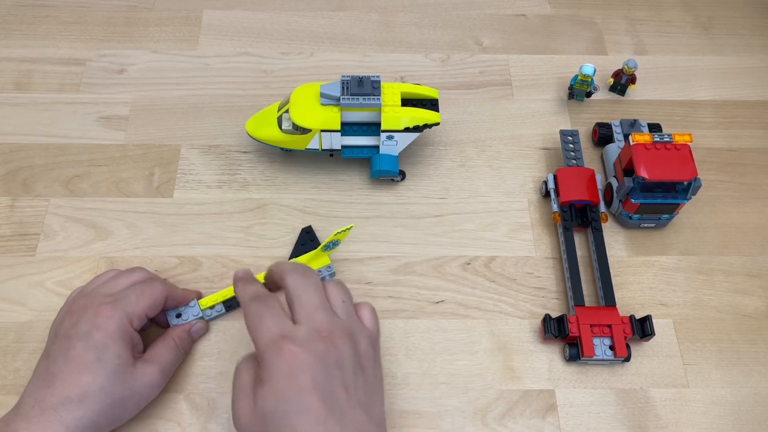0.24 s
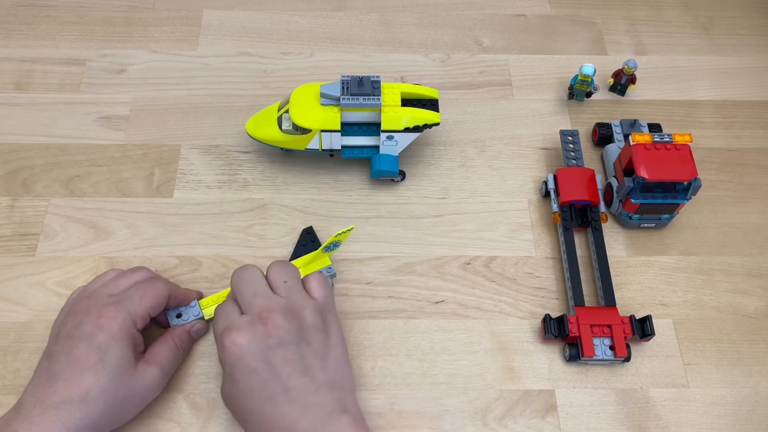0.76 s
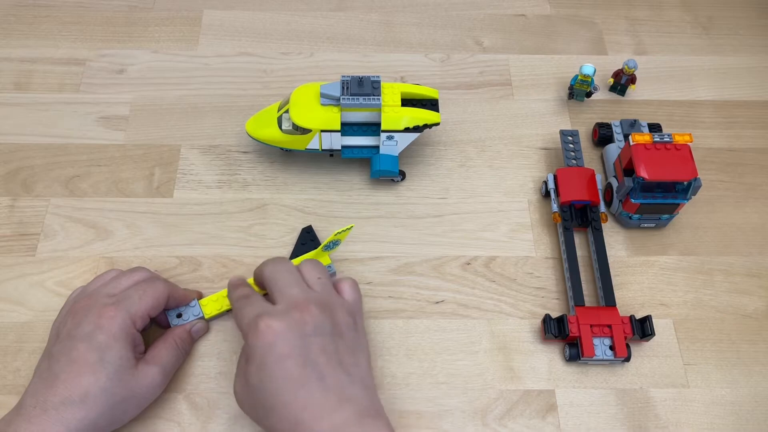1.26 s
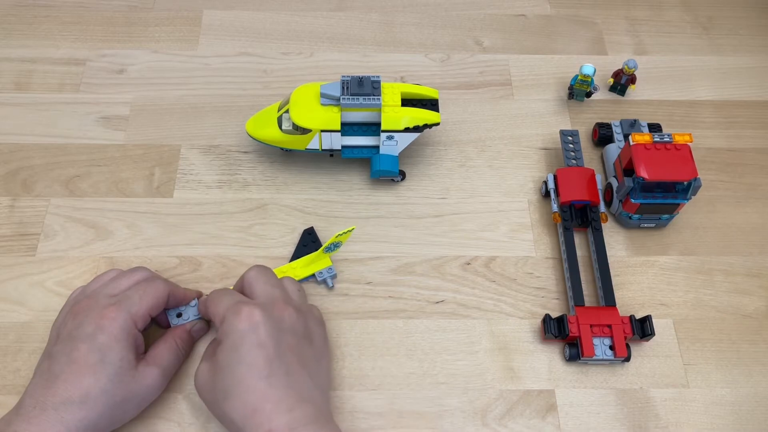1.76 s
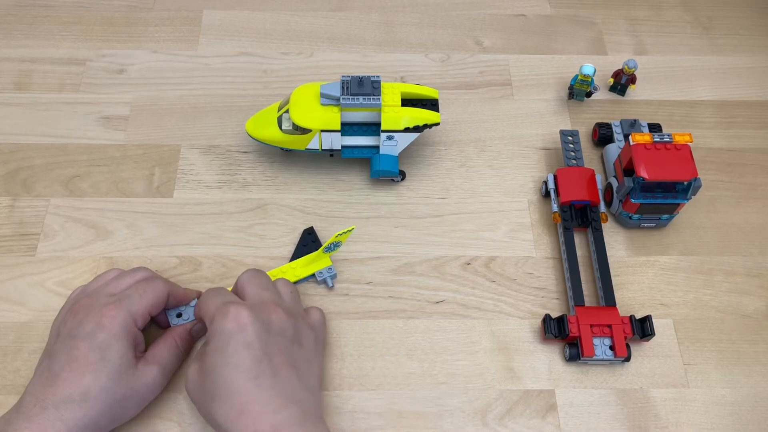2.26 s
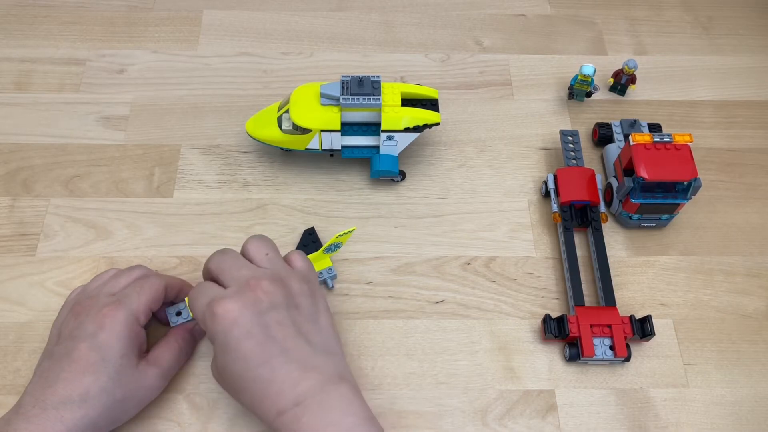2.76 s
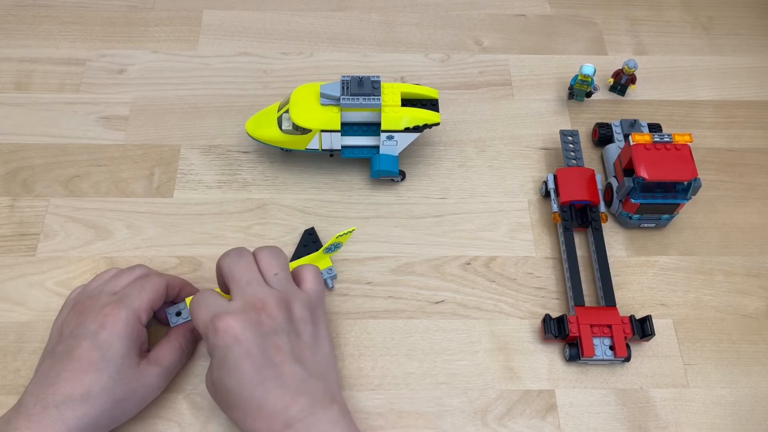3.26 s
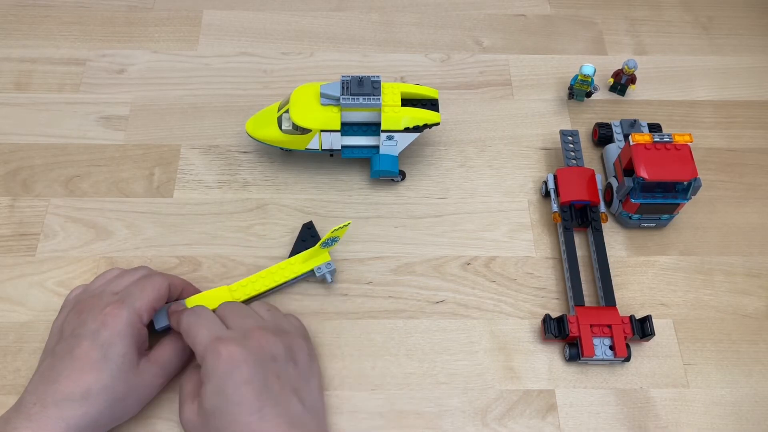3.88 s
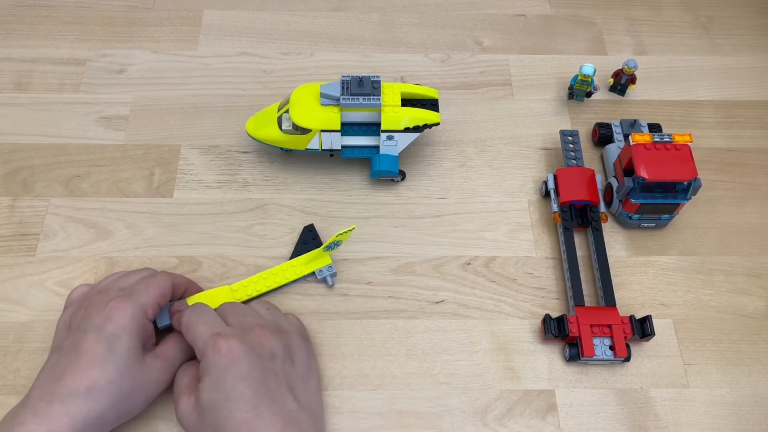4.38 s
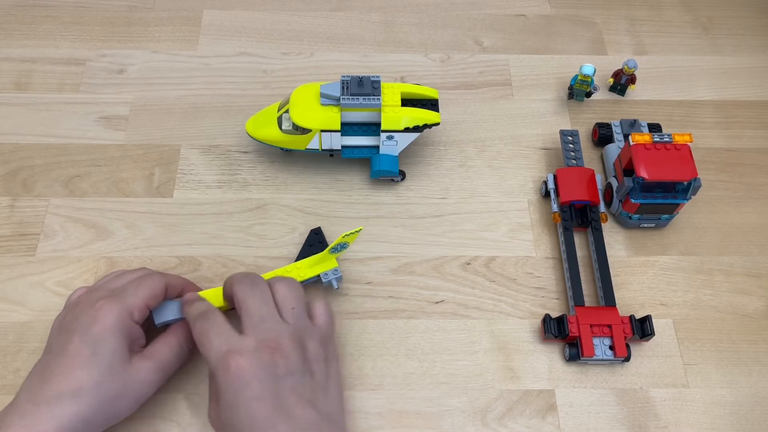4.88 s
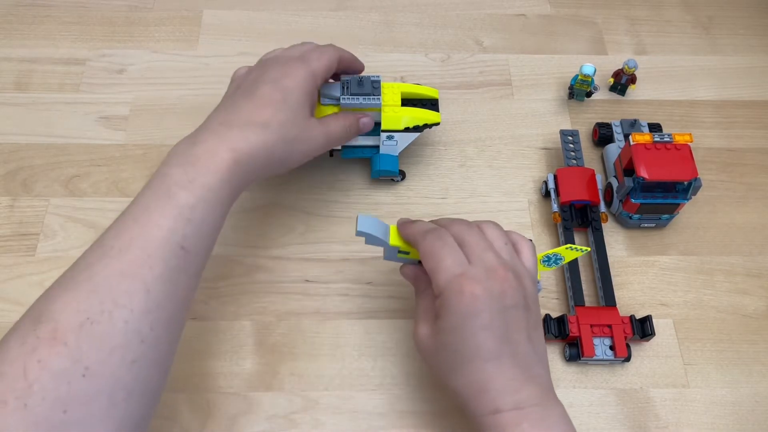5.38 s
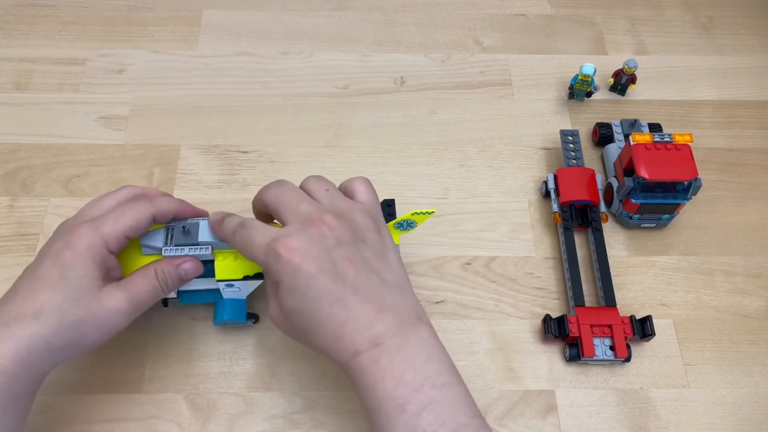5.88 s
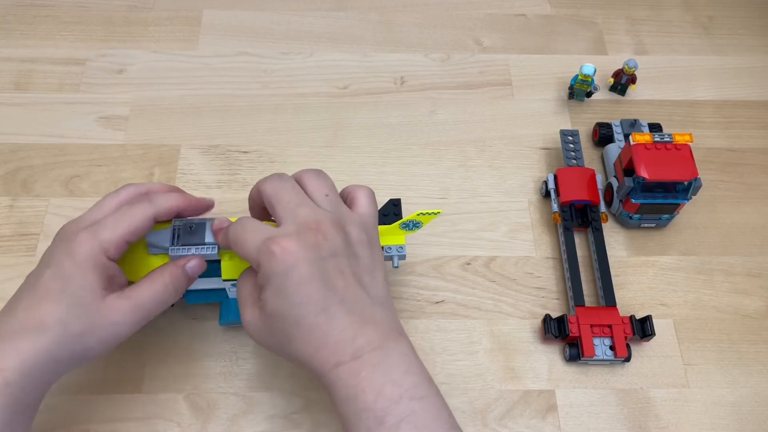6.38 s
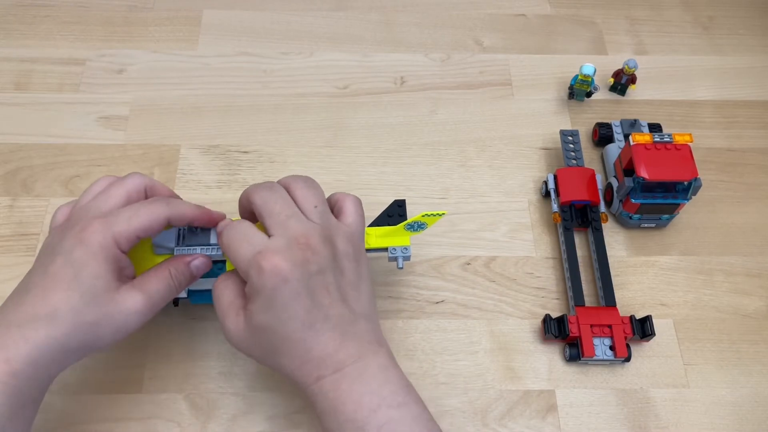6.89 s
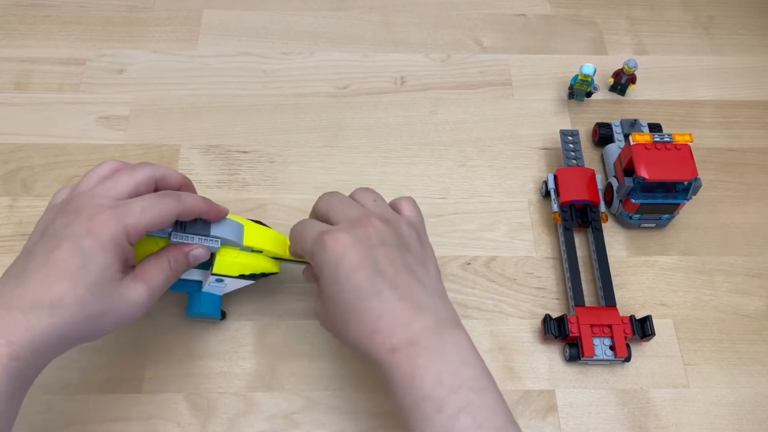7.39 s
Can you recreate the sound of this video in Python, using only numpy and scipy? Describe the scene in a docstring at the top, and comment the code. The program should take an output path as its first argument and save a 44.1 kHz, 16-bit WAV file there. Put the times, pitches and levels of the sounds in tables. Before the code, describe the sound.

A close microphone in a small room picks up low hum, rumble and faint hiss, with soft finger rubs and tiny plastic taps from the start. At 0.9 s a toy brick snaps down with a bright click and solid wooden table thump, ringing briefly in the room. Fingers rub again near 1.15 s. Sound vanishes completely from about 1.47 to 1.76 s, returning with a faint pop. A light click at 1.93 and a duller thumping one at 2.06 s follow, then sparse, very quiet ticks and handling until 5.2 s while the hum swells and dips. A tiny dropout at 5.2 s leaves a quieter hum and drier echo. Hollow plastic rattles cluster at 5.4-5.9 s, faint ticks continue, and two hard, ringing snaps come at 7.36 and 7.5 s, followed by a soft finger rub.

```python
"""A low hum and rumble with a soft rub of fingers come first; then plastic toy bricks are pressed together
by hand on a wooden table in a small room. Plates snap onto a tail boom and thump the table; then the boom is
fitted to a hollow hull, with small rattles and two hard snaps. The sound cuts out briefly twice.
Each contact is a noisy force with one jolt that drives damped resonances, a table thump and diffuse echoes;
hum, rumble, rub and hiss are shaped noise. Echo, hum and rumble change abruptly in the second silence."""
import sys
import numpy as np
from scipy import signal
from scipy.fft import rfft, irfft, next_fast_len
from scipy.io import wavfile
from scipy.ndimage import uniform_filter1d, map_coordinates

SR = 44100
rng = np.random.default_rng(int(sys.argv[2]) if len(sys.argv) > 2 else 0)


def generate_wav(signal):
    """Clip the signal to [-1, 1] and save it as 16-bit WAV at the path in sys.argv[1]."""
    frames = np.transpose(np.atleast_2d(signal))
    scaled = np.clip(frames, -1, 1) * 32767
    pcm = np.round(scaled).astype(np.int16)
    wavfile.write(sys.argv[1], SR, pcm)


N = 336924
SIZE, LEAD = 32768, 1024  # length of one contact and the part of it ahead of the jolt [samples]
HZ = np.fft.rfftfreq(SIZE, 1 / SR)
SECOND_PART_S = 5.21  # echo, hum and rumble change abruptly here, within the second silence [s]

# resonances of the hull in three groups, frame, shell and small plates, before a power sharpens them:
# (centre [Hz], width [Hz], level [dB])
HULL_MODES = ([(792, 150, -1.5), (920, 230, 0)], [(1378, 190, -1.5), (1537, 160, 1.5), (1724, 180, -2)],
              [(2145, 130, -2), (2500, 220, -4), (2938, 280, -1.5), (3810, 340, -4)])


def amp(db):
    """Decibel law: 20 dB are a tenfold amplitude."""
    return 10 ** (np.asarray(db) / 20)


def unit(x):
    """Normalisation to rms 1."""
    return x / np.sqrt(np.mean(x ** 2) + 1e-20)


def burst(x, db):
    """Energy scaling: a short sound gets the energy of 10 ms at this rms level."""
    return x * amp(db) * np.sqrt(SR / 100 / (np.sum(x ** 2) + 1e-20))


def along(points, hz):
    """Interpolation of (Hz, value) points on a logarithmic frequency axis."""
    f, v = np.transpose(points)
    return np.interp(np.log(hz + 1), np.log(f), v)


def curve(rows):
    """Linear interpolation of (s, value) rows to one value per sample."""
    s, v = np.transpose(rows)
    return np.interp(np.arange(N) / SR, s, v)


def wobble(rate):
    """Smooth random variation: a spline through Gaussian knots, rate knots a second."""
    knots = rng.standard_normal(int(N * rate / SR) + 4)
    return map_coordinates(knots, [np.arange(N) * rate / SR])


def filtered(x, response):
    """Linear filtering: the spectrum of x times a response of frequency."""
    m = next_fast_len(len(x) + 8192)
    return irfft(rfft(x, m) * response(np.fft.rfftfreq(m, 1 / SR)), m)[:len(x)]


def noise(spectrum):
    """Coloured noise: steady white noise through a spectrum, rms 1."""
    return unit(filtered(rng.standard_normal(N), lambda hz: amp(along(spectrum, hz))))


def resonance(modes, hz):
    """Damped resonance: the powers of several resonators add to one gain."""
    power = sum((amp(db) * hz * w) ** 2 / ((c * c - hz * hz) ** 2 + (hz * w) ** 2) for c, w, db in modes)
    return np.sqrt(power)


def causal(gain):
    """Minimum phase: folding the cepstrum gives the causal response of this gain, scaled to peak 1."""
    cepstrum = irfft(np.log(gain / gain.max() + 1e-6))
    cepstrum[1:SIZE // 2] *= 2
    cepstrum[SIZE // 2 + 1:] = 0
    return np.exp(rfft(cepstrum))


def ring(force, gain):
    """Forced vibration: a force drives a body that has this gain."""
    return irfft(rfft(force) * causal(gain))


def bricks():
    """Impact excitation: hard snaps and light knocks, each with its jolt at its moment."""
    # studs snapping home, levels as rms over 10 ms: (time [s], table thump [dB], thump cut-off [Hz],
    # frame clack [dB], shell ring [dB], plate crack [dB], stud tick [dB], top octave re tick [dB],
    # rise [ms], room re direct sound [dB], stud pitch [Hz])
    snaps = [(0.903, -30, 900, -41, -39, -57, -31.5, -1, .19, -6.5, 9700),
             (0.9063, -16.5, 900, -33, -27.5, -31.5, -29, -2, 0.96, -4, 6980),
             (1.9292, -47, 600, -56, -38.5, -47.5, -46, -2, 0.34, -4.5, 4300),
             (2.0599, -27, 330, -41, -39, -50.5, -44, -14.5, .29, -5, 4200),
             (7.353, -25.5, 90, -53.5, -48.5, -52, -61.5, -9.5, 1.33, -4, 6000),
             (7.3596, -28.5, 700, -29.5, -15, -19, -26, -3, 3.02, -12.5, 7550),
             (7.372, -38.5, 500, -35, -41, -42, -38, -9, 1.8, -5, 6000),
             (7.5025, -23, 600, -51, -25, -37.5, -27.5, -16.5, 3.03, -11.5, 5600)]
    # light knocks as a piece is shifted in the hands: (time [s], table thump [dB], shell ring [dB],
    # stud tick [dB], top octave re tick [dB], stud pitch [Hz])
    taps = [(0.138, -60, -60.5, -61.5, -1, 3800), (0.163, -59, -63, -62, -3, 9800),
            (0.457, -79, -69, -68.5, -21, 4300), (0.815, -88, -74, -100, -1, 6000),
            (1.2243, -64, -59, -65, -5, 6140), (2.4162, -59.5, -64.5, -52, -11.5, 7065),
            (2.704, -60, -69, -88, -8.5, 6020), (2.734, -52, -64, -99.5, -6, 6000),
            (2.993, -60.5, -77, -74.5, -5.5, 4350), (3.5573, -60, -58, -59, -4.5, 4980),
            (3.89, -65, -60.5, -80.5, -1, 6000), (4.0329, -54.5, -60, -67, -30, 5020),
            (4.046, -57.5, -63.5, -70.5, -25, 5950), (4.185, -49, -85.5, -80, -15, 6000),
            (4.695, -55, -58, -59.5, -46, 5600), (4.862, -81.5, -65, -52.5, -5, 3400),
            (4.999, -73, -70, -75, -10.5, 6000), (5.231, -60, -71, -70, -2, 6500),
            (5.436, -66, -54.5, -84, -8, 3820), (5.4641, -67, -48.5, -70, -11, 3840),
            (5.47, -72, -49.5, -67, -11, 3800), (5.7316, -56, -40.5, -55, -12, 3200),
            (5.7426, -45, -46.5, -47, -16.5, 4450), (5.747, -66, -45, -59, -8, 3400),
            (5.81, -59.5, -57.5, -83.5, -11, 6000), (5.8873, -52, -44, -56.5, -11, 4200),
            (5.9169, -45.5, -48.5, -54.5, -9, 4120), (6.003, -64, -64.5, -77, -3.5, 6000),
            (6.217, -71, -73.5, -88.5, -2, 4420), (6.38, -63.5, -70, -72.5, 1.5, 6000),
            (6.623, -78, -69.5, -64, -5.5, 3600), (7.0896, -54, -59, -65, 2, 7500),
            (7.295, -62, -67, -74.5, -8.5, 6000), (7.332, -69.5, -51.5, -61, -12, 5940)]
    # ring of the small brick under the finger when clamped in a snap [gain]
    snap_stud_ring = 1.4
    out = np.zeros(N + 2 * SIZE)
    for row in snaps:
        out[round(row[0] * SR):][:SIZE] += contact(*row, snap_stud_ring)
    for row in taps:
        out[round(row[0] * SR):][:SIZE] += tap(*row)
    return out[LEAD:LEAD + N]


def contact(s, thump_db, thump_hz, clack_db, ring_db, crack_db, tick_db, top_db, rise_ms, room_db,
            stud_hz, stud_ring):
    """Modal excitation: one contact ticks studs, rings plastic, thumps the table and wakes the room."""
    # resonances of the boom, grouped as frame, shell and small plates, before a power sharpens them:
    # (centre [Hz], width [Hz], level [dB])
    boom_modes = ([(680, 200, 0), (780, 490, -0.5)], [(1282, 170, 2.5), (1536, 240, 0.5),
                  (1810, 150, -6.5)], [(2520, 490, 0), (3010, 400, 0), (3400, 440, -7), (4200, 530, -2.5)])
    # table thump in the first part: (frequency [Hz], relative gain [dB])
    first_table = [(30, -13.5), (60, -8), (130, 0), (220, 1.5), (340, -3.5), (450, -13.5), (700, -27.5),
                   (2000, -61), (5000, -100)]
    # table thump in the second part: (frequency [Hz], relative gain [dB])
    second_table = [(25, -7), (55, -5.5), (100, 3), (160, -6.5), (220, 8), (275, -9.5), (345, -0.5),
                    (430, -16), (540, -7.5), (700, -43.5), (2000, -64.5), (5000, -100)]
    # longer echoes in the first part: (frequency [Hz], time to fall 60 dB [s])
    first_tail = [(60, 0.77), (150, 0.35), (300, 0.16), (700, 0.42), (1400, .48), (2200, 0.22), (3000, .49),
                  (3800, .46), (7000, .37), (15000, 0.16)]
    # drier echoes in the second part: (frequency [Hz], time to fall 60 dB [s])
    second_tail = [(60, 0.6), (200, 0.12), (700, 0.23), (1300, 0.11), (1700, 0.17), (2300, 0.18),
                   (7000, 0.14), (15000, 0.13)]
    # stud tick before its own ring and top octave: (frequency [Hz], relative gain [dB])
    stud_spectrum = [(600, -24), (1500, -10.5), (3000, -5), (4500, 0), (6000, 0.5), (8600, -2.5),
                     (10000, -1), (11500, -4.5), (16000, -9.5)]
    stud_width = 0.13  # re its pitch
    table_echo_db, room_modes_db = 2.5, -0.5  # re the room level of the contact; modes before softening

    if s < SECOND_PART_S:
        modes, table_gain, decay = boom_modes, first_table, first_tail
    else:
        modes, table_gain, decay = HULL_MODES, second_table, second_tail

    # where the piece is pressed decides how strongly frame, shell and plates answer
    levels = (clack_db, ring_db, crack_db)
    parts = [amp(db) * unit(resonance(group, HZ) ** 1.84) for group, db in zip(modes, levels)]
    gain = np.linalg.norm(parts, axis=0)
    body_force = jolt(rise_ms, fall_ms=3.0, grit=2.3)
    body = np.sqrt(np.mean(gain ** 2)) * burst(ring(body_force, gain), 0)

    # the small brick under the finger has its own pitch; a softer contact loses the top octave
    top_octave = along([(8000, 0), (12000, 1)], HZ)
    bright = amp(along(stud_spectrum, HZ) + top_db * top_octave)
    bright *= 1 + stud_ring * resonance([(stud_hz, stud_width * stud_hz, 0)], HZ)
    stud_force = jolt(rise_ms, fall_ms=2.7, grit=19.0)
    plastic = body + burst(ring(stud_force, bright), tick_db)

    # the thump starts just before the jolt; a lower cut-off makes it duller
    soft = 1 / np.sqrt(1 + (HZ / thump_hz) ** 4)
    push = irfft(causal(soft * amp(along(table_gain, HZ))))
    early = round((rise_ms + .6) * SR / 1000)
    table = burst(-np.roll(push, LEAD - early), thump_db)

    echo = room(diffuse(plastic, blur_hz=700), decay, build_s=0.0034)
    echo += amp(table_echo_db) * room(table, decay, build_s=0.0026)
    echo += ring(burst(low_ring(decay), thump_db + room_modes_db), soft)
    return plastic + table + amp(room_db) * echo


def tap(s, thump_db, ring_db, tick_db, top_db, stud_hz):
    """Coupled vibration: in a light knock frame follows table and shell, plates follow shell and stud."""
    # a knock in the first part: (rise [ms], frame clack re the mean of thump and ring [dB],
    # room before the shading by the hand [dB])
    first_touch = (0.55, -1.5, -4.5)
    # a knock in the second part: (rise [ms], frame clack re the mean of thump and ring [dB],
    # room before the shading by the hand [dB])
    second_touch = (2.92, -12.5, -10)
    plates_db = -3.5  # small plates re the mean of shell and stud
    # a hand that hides the top octave leaves more of the room: dB gained per dB lost
    shade_to_room = 0.066
    tap_thump_hz, tap_stud_ring = 790, 2.5  # thump cut-off [Hz]; ring of the loose small brick [gain]
    rise_ms, frame_db, open_room_db = first_touch if s < SECOND_PART_S else second_touch
    clack_db = (thump_db + ring_db) / 2 + frame_db
    crack_db = (ring_db + tick_db) / 2 + plates_db
    room_db = open_room_db - shade_to_room * top_db
    return contact(s, thump_db, tap_thump_hz, clack_db, ring_db, crack_db, tick_db, top_db,
                   rise_ms, room_db, stud_hz, tap_stud_ring)


def jolt(rise_ms, fall_ms, grit):
    """Impulsive force: noise swells up to one jolt, then dies away."""
    ms = (np.arange(SIZE) - LEAD) * 1000 / SR
    swell = rng.standard_normal(SIZE) * np.exp(-np.abs(ms) / np.where(ms < 0, rise_ms, fall_ms))
    force = grit * swell / np.linalg.norm(swell) + (ms == 0)
    # a hard contact drives all frequencies about equally
    return ring(force, 1 / (unit(np.abs(rfft(force))) + 1.3))


def diffuse(x, blur_hz):
    """Radiation on all sides: it evens out the narrow peaks and dips of a piece, at equal energy."""
    power = np.abs(rfft(x)) ** 2 + 1e-14
    broad = np.abs(uniform_filter1d(power, size=max(1, int(blur_hz / HZ[1]))))
    evened = ring(x, np.clip(broad / power, .1, 8) ** .2)
    return burst(evened, db=0) * np.sqrt(np.sum(x ** 2) * 100 / SR)


def room(x, decay, build_s):
    """Diffuse reverberation: echoes with the energy of x, each frequency dying at its own speed."""
    hz, t, z = signal.stft(rng.standard_normal(SIZE), SR, nperseg=256)
    t60 = along(decay, hz)[:, None]
    fading = z * amp(-60 * t / t60) / np.sqrt(t60)
    tail = signal.istft(fading, SR, nperseg=256)[1][:SIZE]
    tail *= 1 - np.exp(-(np.arange(SIZE) / SR / build_s) ** 2)
    wet = signal.fftconvolve(x, tail)[:SIZE]
    return wet * np.linalg.norm(x) / np.linalg.norm(wet)


def low_ring(decay):
    """Room modes: the low resonances of the room swell and fade after a thump."""
    # low resonances of the room: (frequency [Hz], relative level [dB])
    room_modes = [(138, 0.5), (162, -8), (218, -2.5), (256, -3.5), (298, -8), (343, -6), (384, -11.5),
                  (532, -15)]
    t = np.maximum(np.arange(SIZE) - LEAD, 0) / SR
    total = np.zeros(SIZE)
    for hz, db in room_modes:
        fade = amp(db - 60 * t / along(decay, hz))
        total += fade * np.sin(2 * np.pi * (hz * t + rng.random()))
    return total * (1 - np.exp(-t / 0.0044))


def fingers():
    """Stick-slip friction: skin drags over plastic in uneven slips, swelling with each change of grip."""
    # colour of skin on plastic: (frequency [Hz], relative level [dB])
    skin = [(200, -11), (700, 1), (1100, -3), (1650, -2.5), (2200, -11.5), (4000, -13), (7000, -14),
            (15000, -26.5)]
    # fingers sliding to a new grip: (middle [s], half length [s], level [dB])
    slides = [(0.014, 0.075, -74), (0.165, 0.025, -63.5), (0.41, .04, -78), (1.15, 0.079, -64.5),
              (4.421, .16, -77.5), (4.981, 0.055, -71.5), (7.62, 0.073, -73.5)]
    # fingers that merely hold a piece, and how much their pressure wanders
    grip_db, grip_wander_db = -79, 0.5
    t = np.arange(N) / SR
    unevenness_db = 2.5 * wobble(14) + 3.5 * wobble(120)
    drag = unit(noise(skin) * amp(unevenness_db))
    strokes = sum(amp(db) * np.exp(-((t - s) / half_s) ** 2) for s, half_s, db in slides)
    return drag * (amp(grip_db + grip_wander_db * wobble(2)) + strokes)


def loose_parts():
    """Random impulses: in the second part, loose parts of the hull tick faintly against the shell."""
    ticks_per_s, level_db = 4.7, -87
    nudges = (rng.random(N) < ticks_per_s / SR) * rng.uniform(.3, 1, N)
    shell = irfft(causal(resonance(HULL_MODES[1], HZ) ** 1.45))
    ticks = unit(signal.fftconvolve(nudges, shell)[:N])
    return amp(level_db) * ticks * (np.arange(N) / SR > SECOND_PART_S)


def pops():
    """Step relaxation: tiny dry pops, each a step that decays exponentially at once."""
    # faint pops with no echo: (time [s], level over 10 ms [dB])
    moments = [(1.7598, -58), (2.6511, -50.5), (3.8048, -53.5), (5.1994, -48)]
    out, t = np.zeros(N + SIZE), np.arange(SIZE) / SR
    for s, db in moments:
        out[round(s * SR):][:SIZE] += burst(np.exp(-t / 0.0018), db)
    return out[:N]


def background():
    """Shaped noise: hum, rumble and hiss drop abruptly in the second silence; another low rumble follows."""
    # humming bands before a power sharpens them: (centre [Hz], width [Hz], level [dB])
    hum_bands = [(57, 8, 3), (117.74, 9, -10.5), (289.5, 19, -17), (475, 20, -21)]
    # hum before the offset of each part, ahead of and after the first silence: (time [s], level [dB])
    hum_level = [
        [(0.0, -49), (0.2, -46), (0.464, -61.5), (0.572, -67), (1.294, -51.5), (1.36, -59)],
        [(1.88, -57.5), (3.34, -47), (3.85, -47.5), (4.23, -56.5), (4.92, -48.5), (5.1, -50.5)],
    ]
    # rumble that is strong in the first part: (frequency [Hz], relative level [dB])
    first_spectrum = [(3, 6), (11, 8.5), (22, 0), (33, -0.5), (45, -11), (80, -17), (118, -19),
                      (160, -24.5), (290, -28.5), (420, -38), (800, -47), (2000, -73.5)]
    # rumble that is strong in the second part: (frequency [Hz], relative level [dB])
    second_spectrum = [(15, -12.5), (25, 3), (65, 2), (100, 0.5), (160, -14), (260, -16.5), (400, -29),
                       (800, -43.5), (2000, -81)]
    # hiss: (frequency [Hz], relative level [dB])
    hiss_spectrum = [(100, 13), (500, 11.5), (1000, -4.5), (2000, -3.5), (5000, -6), (10000, -10),
                     (16000, -10.5)]
    # first part: (hum re its level curve [dB], first rumble [dB], second rumble [dB], hiss [dB])
    first_floor = (4, -43.5, -66.5, -72)
    # second part: (hum re its level curve [dB], first rumble [dB], second rumble [dB], hiss [dB])
    second_floor = (-15.5, -54.5, -51, -74)
    swell_per_s, swell_db = 4, 2  # slow swell of the rumbles: knots a second, depth [dB]

    in_first = np.arange(N) / SR < SECOND_PART_S
    floors = [np.where(in_first, early_db, late_db) for early_db, late_db in zip(first_floor, second_floor)]
    hum_db, first_db, second_db, hiss_db = floors
    # narrow bands of noise flutter
    bands = unit(filtered(rng.standard_normal(N), lambda hz: resonance(hum_bands, hz) ** 1.77))
    hum = amp(hum_db + curve(np.vstack(hum_level))) * bands
    first_rumble = amp(first_db + swell_db * wobble(swell_per_s)) * noise(first_spectrum)
    second_rumble = amp(second_db + swell_db * wobble(swell_per_s)) * noise(second_spectrum)
    hiss = amp(hiss_db) * noise(hiss_spectrum)
    return hum + first_rumble + second_rumble + hiss


def scene():
    """Superposition: bricks, fingers and room add up at one microphone."""
    return (bricks() + fingers() + loose_parts() + pops() + background())[None]


def record(dry):
    """Gating and band limiting: the sound cuts out briefly twice; a steep low-pass ends the band."""
    # silences: (start [s], end [s])
    silences = [(1.472, 1.759), (5.2005, 5.223)]
    top_hz = 15850  # half amplitude
    t = np.arange(N) / SR
    live = np.prod([(t < start) | (t > end) for start, end in silences], axis=0)
    gated = dry[0] * uniform_filter1d(live.astype(float), size=64)
    return filtered(gated, lambda hz: 1 / (1 + (hz / top_hz) ** 200))[None]


dry = scene()
out = record(dry)
generate_wav(out)
```